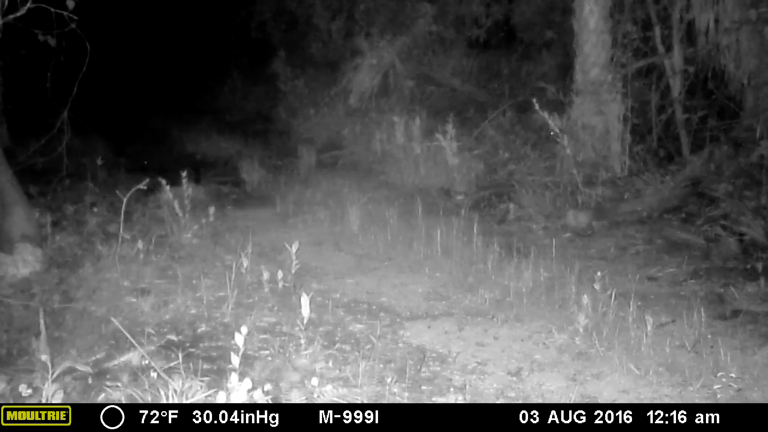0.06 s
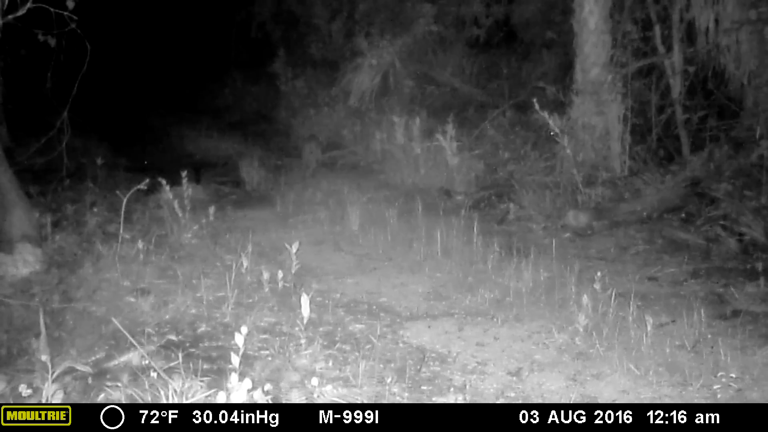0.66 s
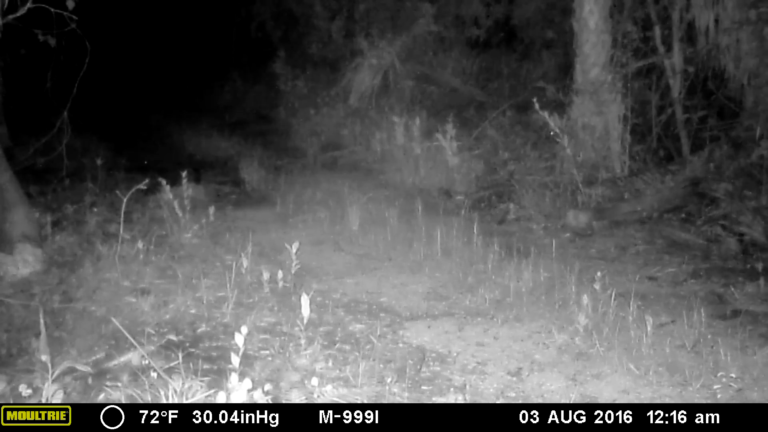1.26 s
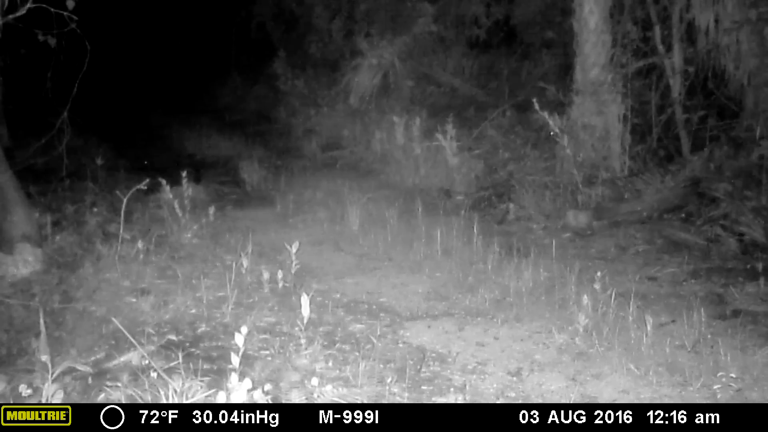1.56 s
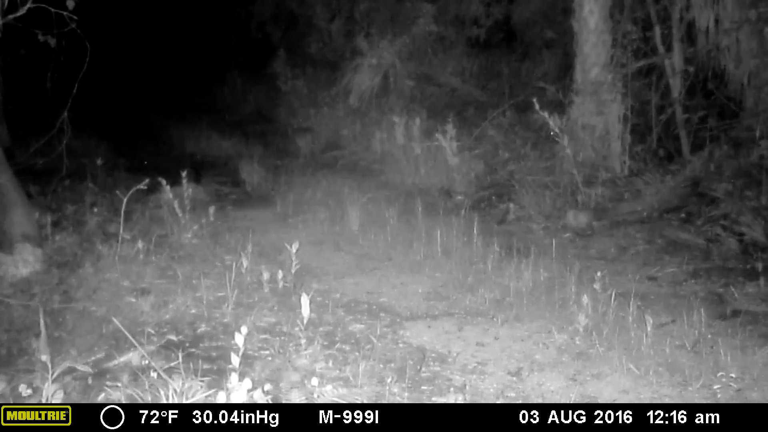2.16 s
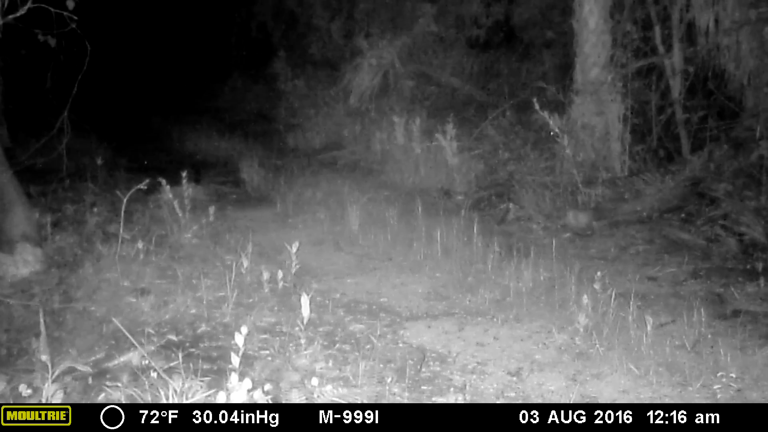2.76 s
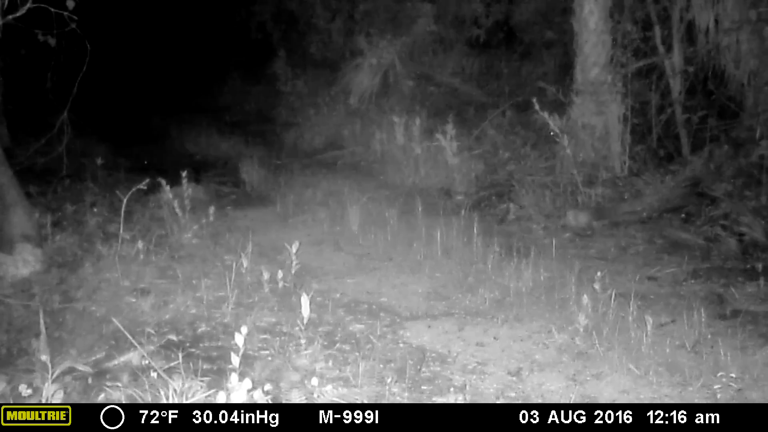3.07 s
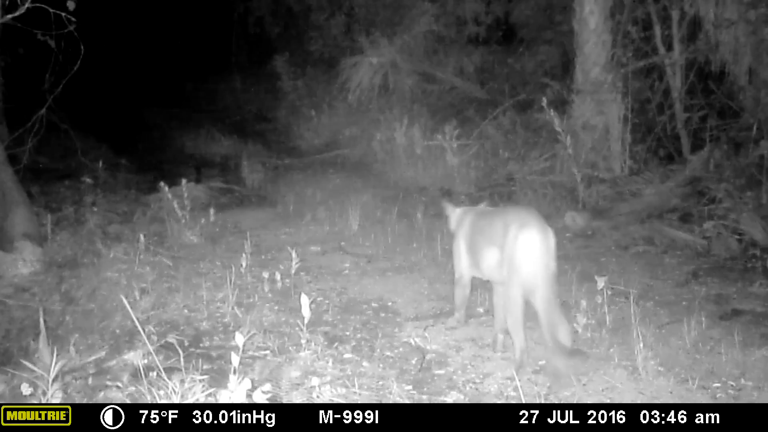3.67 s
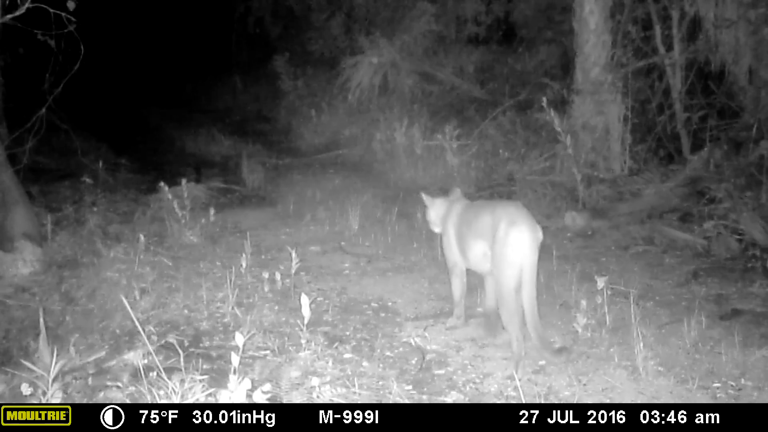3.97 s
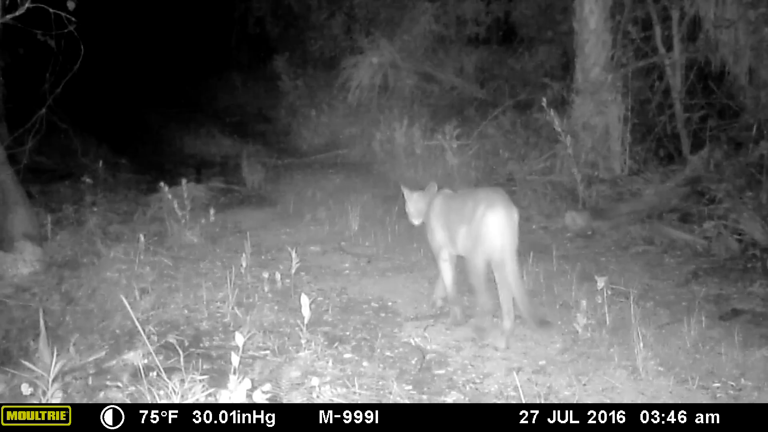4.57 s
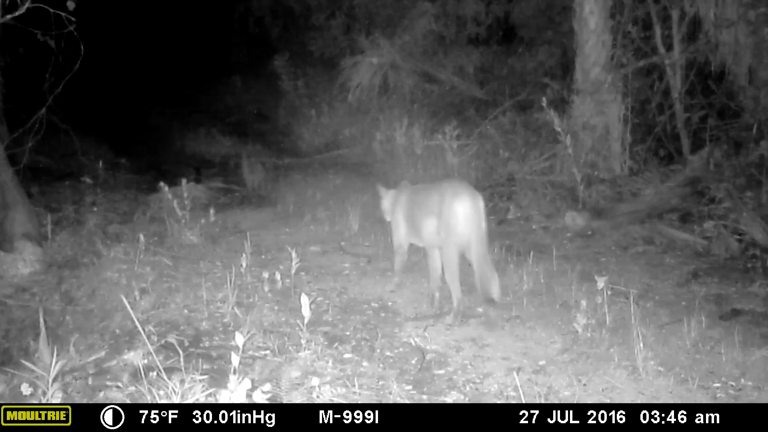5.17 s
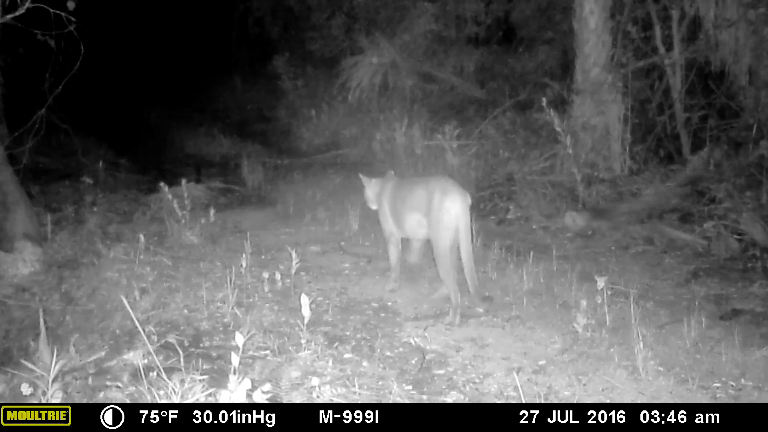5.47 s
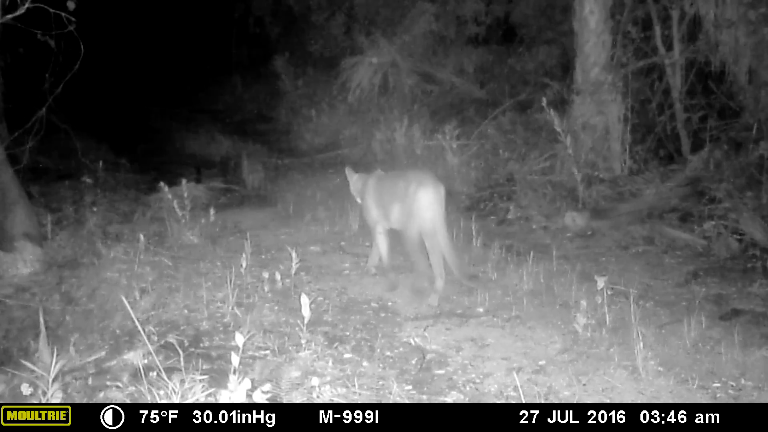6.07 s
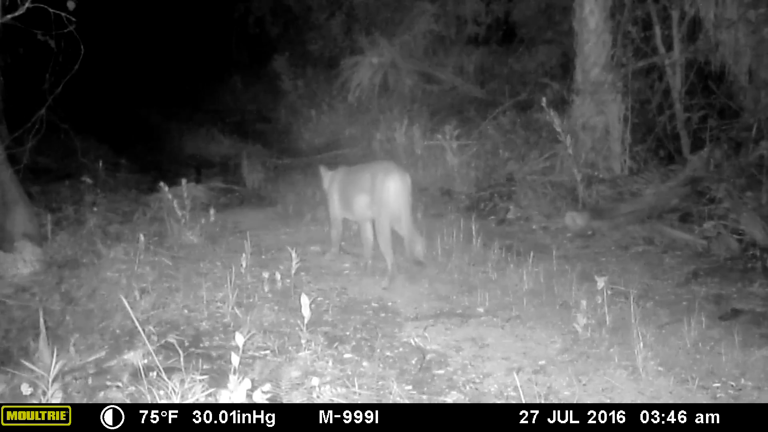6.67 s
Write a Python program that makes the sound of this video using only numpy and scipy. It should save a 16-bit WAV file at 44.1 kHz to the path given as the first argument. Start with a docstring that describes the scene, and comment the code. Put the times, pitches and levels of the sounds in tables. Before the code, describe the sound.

From the start, a dense, high-pitched chorus of crickets shimmers in a wood at night, with several nearer ones chirping about five times a second. Beneath them are a faint, low drone from a distant engine and a soft murmur of air. The small mono microphone adds an even hiss and a very thin, high whine. A soft thud sounds close by at about 1.5 seconds.

At 3.4 seconds everything cuts out abruptly, then fades back in over about a second. The engine is gone, and the crickets now sing slightly higher and a little louder. A small dry tick comes at 3.9 seconds, during the fade. At about 6.1, 6.4 and 6.7 seconds a frog gives three short, raspy, pulsing grunts that echo off the trees, while the crickets carry on to the end at around 7 seconds.

```python
"""Crickets chirp all round a woodland path at night, each rubbing its wings to make a high ringing note.
They are heard through a trail camera's small mono microphone, with its own hiss and thin whine.
A far engine drones at first, over the soft murmur of the air. The sound cuts out and fades in on a
second night, whose crickets sing a little higher, and a frog grunts three times through its throat
and vocal sac. There is one small knock near the camera on each night."""
import sys
import numpy as np
from scipy import signal
from scipy.fft import rfft, irfft, next_fast_len
from scipy.io import wavfile
from scipy.ndimage import uniform_filter1d, map_coordinates

SR = 44100
rng = np.random.default_rng(int(sys.argv[2]) if len(sys.argv) > 2 else 0)


def bounce(signal):
    """Save signal as a 16-bit WAV file at the path given by the first command-line argument."""
    frames = np.transpose(np.atleast_2d(signal))
    limited = np.clip(frames, -1, 1)
    pcm = np.round(limited * 32767).astype(np.int16)
    wavfile.write(sys.argv[1], SR, pcm)


N = 300762
CUT_S = 3.391  # the first night ends and the second begins


def amp(db):
    """Turn decibels into a number to multiply a sound by."""
    return 10 ** (np.asarray(db) / 20)


def clock():
    """The time of every sample, in seconds."""
    return np.arange(N) / SR


def wobble(rate_hz):
    """A smooth curve through rate_hz random values a second."""
    return map_coordinates(rng.standard_normal(int(N * rate_hz / SR) + 4), [clock() * rate_hz])


def filtered(sound, response):
    """Turn each frequency of a sound up or down by response(hz)."""
    size = next_fast_len(N + SR // 2)
    return irfft(rfft(sound, size) * response(np.fft.rfftfreq(size, 1 / SR)), size)[:N]


def coloured(sound, spectrum):
    """Shape a sound's tone by rows of (pitch_hz, gain_db), then set its average (rms) level to 1."""
    pitch_hz, gain_db = np.transpose(spectrum)
    shaped = filtered(sound, lambda hz: amp(np.interp(np.log(hz + 1), np.log(pitch_hz), gain_db)))
    return shaped / np.sqrt(np.mean(shaped ** 2) + 1e-20)


def add(track, start_s, sound):
    """Mix a sound into the track from start_s on."""
    i = round(start_s * SR)
    part = sound[max(-i, 0):max(N - i, 0)]
    track[max(i, 0):max(i, 0) + len(part)] += part


def among_trees(sound, fade_s, echo_db):
    """Trunks and leaves scatter a sound into an echo that falls 60 dB in fade_s."""
    t = np.arange(SR // 3) / SR
    tail = rng.standard_normal(len(t)) * amp(-60 * t / fade_s)
    path = amp(echo_db) * tail / np.linalg.norm(tail)
    path[0] += 1  # the sound that arrives directly
    return signal.fftconvolve(sound, path / np.linalg.norm(path))


def wing_song(t, hz, strokes_per_s, fall_hz):
    """Each closing of the wings rings a pulse whose pitch falls as the wing's toothed ridge slows."""
    stroke = (t * strokes_per_s + rng.random()) % 1
    pitch_hz = hz + fall_hz * (.5 - stroke)
    return np.sin(np.pi * stroke) * np.sin(2 * np.pi * np.cumsum(pitch_hz) / SR)


# The tone of the many far crickets on each night. Columns: pitch_hz, gain_db
FIRST_NIGHT_CHORUS = [(5200, -38), (5340, -25), (5430, -7.5), (5520, -11.5), (5630, 0), (5710, -5),
                      (5795, 3), (5860, -17), (5940, -5.5), (6060, -2.5), (6270, -5), (6380, -17),
                      (6520, -36)]
SECOND_NIGHT_CHORUS = [(5350, -44), (5440, -22), (5615, -22), (5660, -8), (5790, -10), (5905, 1.5),
                       (5970, -14), (6025, -0.5), (6170, -5), (6250, -17), (6410, -10.5), (6580, -15),
                       (6690, -24), (6820, -49)]


def far_crickets(spectrum, lowest_hz, highest_hz, start_s, count=36):
    """Each far cricket keeps its own wavering pitch and beat; together they blur into one shimmer."""
    out, t = np.zeros(N), np.arange(N // 2 + SR // 10) / SR
    waver_times = np.arange(0, 4, 1 / 64)
    for hz in np.linspace(lowest_hz, highest_hz, count):
        chirps_per_s = 5 * np.exp(0.1496 * rng.normal())
        chirping = 1 + 0.45 * np.cos(2 * np.pi * (chirps_per_s * t + rng.random()))
        waver_hz = 45 * np.interp(t, waver_times, rng.standard_normal(len(waver_times)))
        strokes_per_s = 55 * np.exp(.2 * rng.normal())
        add(out, start_s, chirping * wing_song(t, hz + waver_hz, strokes_per_s, fall_hz=294))
    chorus = coloured(out, spectrum)
    return chorus / np.std(chorus[round(start_s * SR):][:N // 2])  # level 1 while they sing


# How the engine's firing hum rises and falls, before tone_db is added. Columns: time_s, level_db
ENGINE_LEVELS = [(0.0, -60), (0.03, -56), (0.84, -57), (0.86, -61.5), (2.11, -53.5), (3.12, -59.5),
                 (3.15, -77), (3.27, -62), (3.38, -66)]
# The tones in that hum. Columns: cycles_per_shaft_turn, gain_db
ENGINE_TONES = [(2, -12), (3, -18), (4, -8), (5, 2.5)]
# The tone of the engine's rumble. Columns: pitch_hz, gain_db
ENGINE_RUMBLE = [(15, -7), (30, -4.5), (60, -1.5), (110, -1), (150, -0.5), (200, -12), (300, -20),
                 (600, -39.5)]


def far_engine(shaft_hz=21.26, tone_db=-3.4, rumble_db=-58.5, swell_db=1.0):
    """Only an engine's lowest tones and a dull, gently swelling rumble carry this far."""
    firing_db = np.interp(clock(), *np.transpose(ENGINE_LEVELS))
    shaft_angle = 2 * np.pi * np.cumsum(shaft_hz * (1 + 0.0044 * wobble(4.27))) / SR
    hum = np.zeros(N)
    for cycles, db in ENGINE_TONES:
        strength = np.sqrt(2) * amp(db + 2.0 * wobble(5.03))
        hum += strength * np.sin(cycles * shaft_angle + rng.uniform(0, 2 * np.pi))
    rumble = amp(rumble_db + swell_db * wobble(3.1)) * coloured(rng.standard_normal(N), ENGINE_RUMBLE)
    return amp(firing_db + tone_db) * hum + rumble


# The tone of still night air. Columns: pitch_hz, gain_db
AIR_MURMUR = [(15, -2.5), (50, 1), (150, -1), (400, -3), (1000, -7), (2000, -12), (4500, -16), (9000, -30)]


def night_air(air_db=-59.0, hiss_db=-58.5):
    """The wood murmurs, soft and slightly restless, under the microphone's even hiss."""
    murmur = coloured(rng.standard_normal(N), AIR_MURMUR)
    hiss = rng.standard_normal(N)
    return amp(air_db + 0.71 * wobble(7)) * murmur + amp(hiss_db) * hiss


def camera_whine(line_hz=15734.3, frames_per_s=29.97, low_db=-67.0, high_db=-73):
    """The picture circuit whistles at its line rate and at half of it; the low wave flips each frame."""
    t = clock()
    flip = np.sign(np.sin(np.pi * frames_per_s * t))
    low = amp(low_db) * flip * np.sin(np.pi * line_hz * t)
    high = amp(high_db) * np.sin(2 * np.pi * line_hz * t)
    return np.sqrt(2) * (low + high)


# Near crickets, one row for each run of steady chirps.
# Columns: first_chirp_s, end_s, beat_s, pitch_hz, level_db
STEADY_CHIRPS = [(0.01, 3.39, .2035, 5430, -59.5), (0.094, 3.39, .1955, 5635, -51.5),
                 (0.105, 3.39, .2185, 5797, -52.5), (0.605, 3.39, .223, 6060, -52),
                 (0.186, 3.39, .446, 6240, -54.5), (3.55, 4.3, .207, 5490, -58),
                 (4.425, 5.7, .169, 5490, -60), (5.765, 6.85, .202, 5490, -60),
                 (3.68, 6.85, .197, 5695, -56), (4.887, 6.85, .167, 5915, -48.5),
                 (3.68, 6.85, .198, 6025, -48.5), (4.53, 6.85, .187, 6180, -50.5)]
# Single chirps that stand out from the beat. Columns: middle_s, pitch_hz, level_db
STANDOUT_CHIRPS = [(0.29, 5610, -47.5), (1.96, 6080, -50), (2.82, 5630, -49), (3.88, 6030, -43),
                   (4.49, 6010, -46.5), (4.89, 6020, -48.5), (5.65, 6030, -44.5)]


def near_crickets(length_s=.075, sag_hz=40, trim_db=-2.0):
    """A chirp is a few wing strokes that swell, fade and sag in pitch; trim_db turns them all down."""
    out, t = np.zeros(N), np.arange(SR // 8) / SR
    progress = np.minimum(t / length_s, 1)
    for middle_s, hz, db in chirp_list(STEADY_CHIRPS, STANDOUT_CHIRPS):
        fall_hz = np.interp(hz, [5500, 5600], [320, 80])  # the lowest voices slide furthest
        strokes_per_s = 36 * np.exp(0.13 * rng.normal())
        strokes = wing_song(t, hz + sag_hz * (.5 - progress), strokes_per_s, fall_hz)
        chirp = among_trees(strokes * np.sin(np.pi * progress), fade_s=.14, echo_db=-1.0)
        chirp /= np.sqrt(np.sum(chirp ** 2) / (length_s * SR))
        add(out, middle_s - length_s / 2 - .004, amp(db + trim_db) * chirp)
    return out


def chirp_list(steady, standouts, max_beats=20, stray_s=.006, stray_db=1.0):
    """Chirps stray a little in time and level; a standout replaces a beat close in time and pitch."""
    chirps = list(standouts)
    for first_s, end_s, beat_s, hz, db in steady:
        for k, (late, louder) in enumerate(rng.standard_normal((max_beats, 2))):
            middle_s = first_s + k * beat_s
            taken = any(abs(middle_s - loud_s) < beat_s / 2 and abs(hz / loud_hz - 1) < .01
                        for loud_s, loud_hz, _ in standouts)
            if middle_s < end_s and not taken:
                chirps.append((middle_s + stray_s * late, hz, db + stray_db * louder))
    return chirps


# Small knocks near the camera; the second is much quietened by the fade-in.
# Columns: start_s, level_db, pitch_hz, fade_s (time to fall 60 dB)
SMALL_KNOCKS = [(1.482, -46, 305, 0.076), (3.902, -15, 200, 0.0033)]


def knocks(crack=0.41, dull_above_hz=2700):
    """A soft thud and a dry tick: each is a low tone plus noise, dying fast, with the treble dulled."""
    out, t = np.zeros(N), np.arange(SR // 5) / SR
    for start_s, db, hz, fade_s in SMALL_KNOCKS:
        hit = crack * rng.standard_normal(len(t)) - np.sin(2 * np.pi * hz * t)
        add(out, start_s, amp(db - 60 * t / fade_s) * hit)
    return filtered(out, lambda hz: 1 / (1 + 1j * hz / dull_above_hz) ** 2)


# The frog's grunts, before its throat shapes them. Columns: start_s, level_db
FROG_GRUNTS = [(6.135, -4.2), (6.421, -5.6), (6.712, -4.8)]
# Where its vocal sac (first two rows) and throat ring. Columns: pitch_hz, width_hz, gain_db
FROG_RESONANCES = [(292.6, 22, 3.5), (396, 93, -2), (910, 180, -4.5), (1078, 105, -2), (1467, 160, -4),
                   (1700, 110, -3.5), (1965, 85, 2), (2066, 74, 1.5), (2320, 320, -7.5), (2830, 170, -8.5),
                   (4300, 480, -13)]


def frog(grunt_s=.135, pulses_per_s=57.5, rasp=0.06, sac_boost_db=0.5):
    """Each grunt is a short roll of raspy pulses that ring the throat and sac and echo off the trees."""
    def throat(hz):
        """Each resonance lets through the pitches near its own; they add with alternating signs."""
        response = 0
        for k, (pitch_hz, width_hz, db) in enumerate(FROG_RESONANCES):
            peak = 1j * hz * width_hz / (pitch_hz ** 2 - hz ** 2 + 1j * hz * width_hz)
            response += (-1) ** k * amp(db + sac_boost_db * (k < 2)) * peak
        return response

    out, t = np.zeros(N), np.arange(SR // 50) / SR
    for start_s, db in FROG_GRUNTS:
        pulses = np.zeros(N)
        for after_s in np.arange(.004, grunt_s, 1 / pulses_per_s):
            pulse = (t == 0) + rasp * rng.standard_normal(len(t)) * amp(-60 * t / 0.04)  # click + rasp
            pulse /= np.linalg.norm(pulse)
            swell = np.sin(np.pi * after_s / grunt_s)
            pulse_s = start_s + after_s + rng.normal(0, .0005)
            add(pulses, pulse_s, amp(db + rng.normal(0, 1)) * swell * pulse)
        out += among_trees(filtered(pulses, throat), fade_s=.75, echo_db=4.5)[:N]
    return out


def scene():
    """Two nights on the same path, joined at the cut; both channels are alike."""
    first_night = amp(-48.0) * far_crickets(FIRST_NIGHT_CHORUS, 5250, 6450, start_s=0) + far_engine()
    second_night = amp(-45.5) * far_crickets(SECOND_NIGHT_CHORUS, 5400, 6750, start_s=CUT_S)
    distance = np.where(clock() < CUT_S, first_night, second_night)
    mono = distance + night_air() + knocks() + frog() + camera_whine() + near_crickets()
    return np.array([mono, mono])


def record(dry, mute_db=-39.0, rise_db_per_s=41.0, offset_db=-74, hiss_db=-88, top_hz=15900):
    """The camera mutes at the cut and fades back in; its converter drops everything above top_hz."""
    since_cut_s = clock() - CUT_S
    gain_db = np.where(since_cut_s < 0, 0, np.minimum(mute_db + rise_db_per_s * since_cut_s, 0))
    gain = uniform_filter1d(amp(gain_db), size=48)  # the mute closes in about a millisecond
    converter = amp(hiss_db) * rng.standard_normal(N) - amp(offset_db)  # faint hiss, just off zero
    return np.array([filtered(channel * gain + converter, lambda hz: hz < top_hz) for channel in dry])


dry = scene()
out = record(dry)
bounce(out)
```